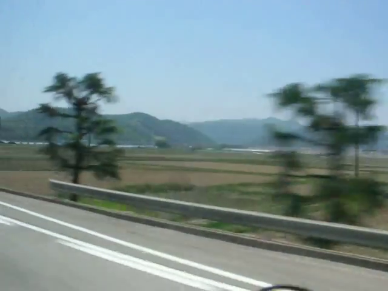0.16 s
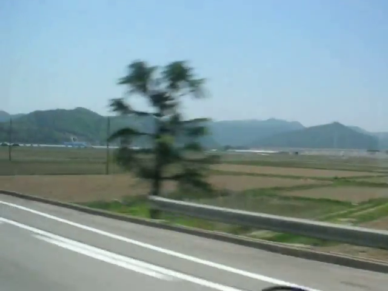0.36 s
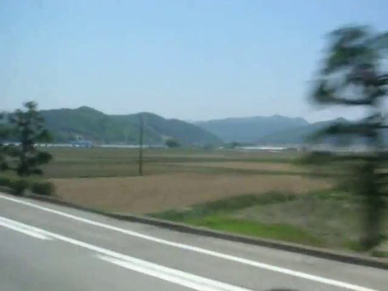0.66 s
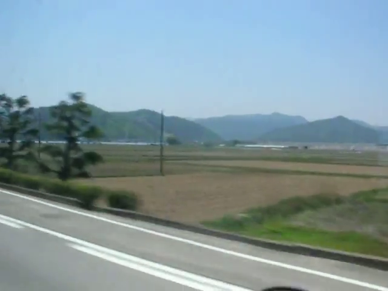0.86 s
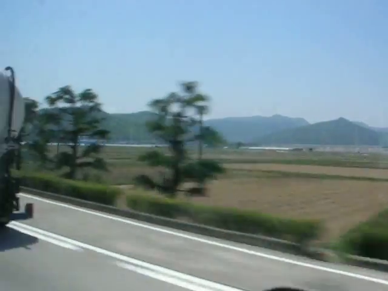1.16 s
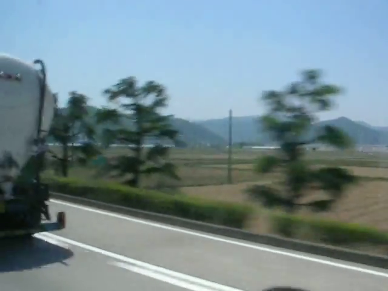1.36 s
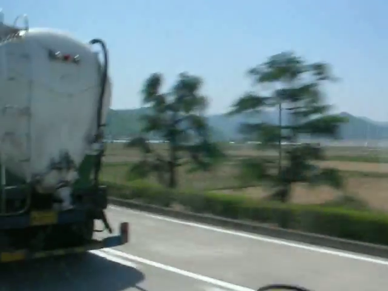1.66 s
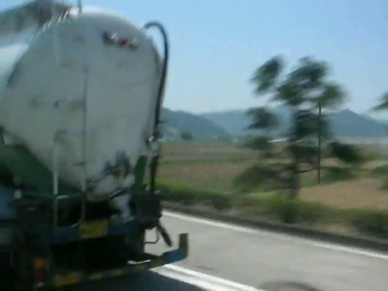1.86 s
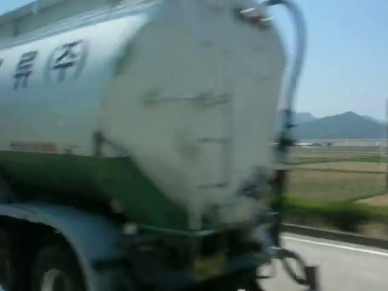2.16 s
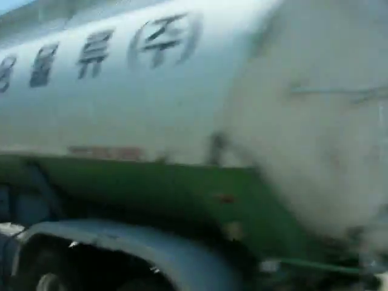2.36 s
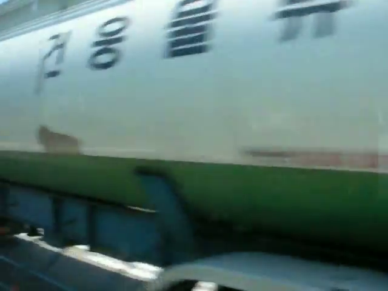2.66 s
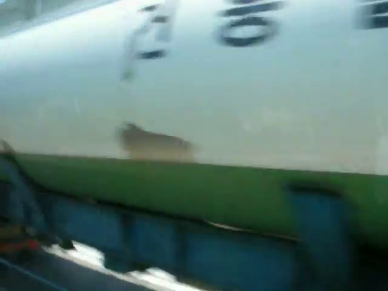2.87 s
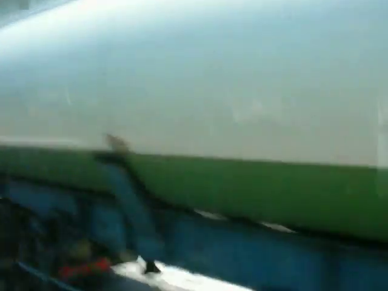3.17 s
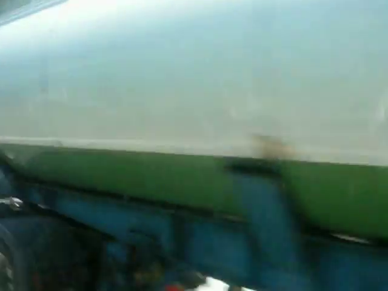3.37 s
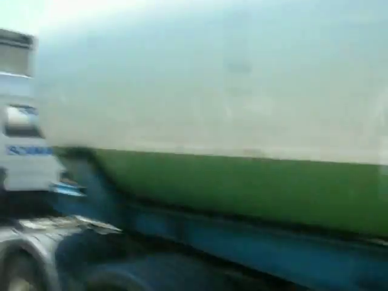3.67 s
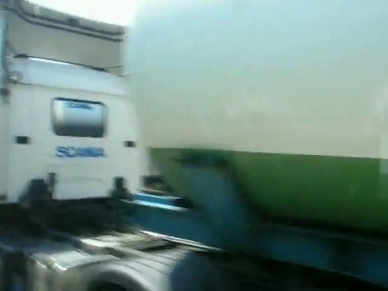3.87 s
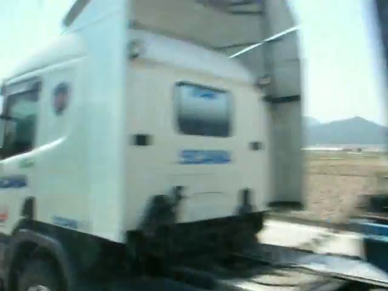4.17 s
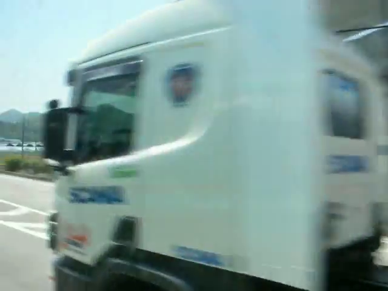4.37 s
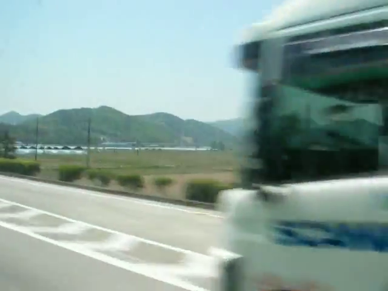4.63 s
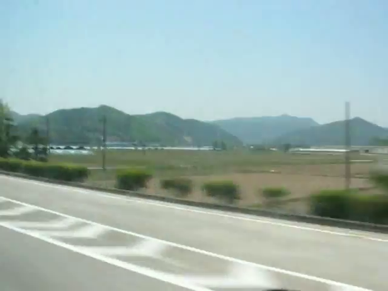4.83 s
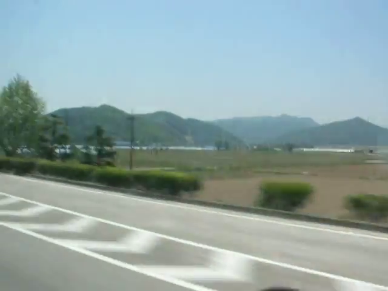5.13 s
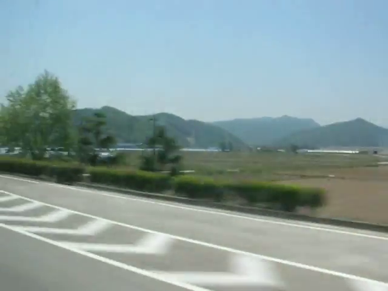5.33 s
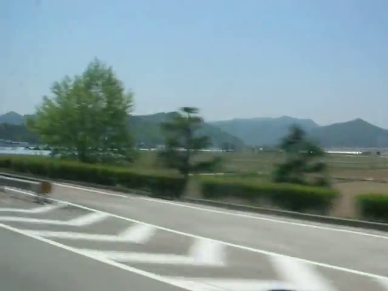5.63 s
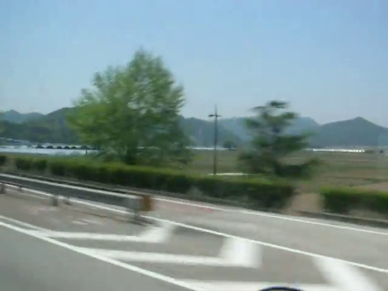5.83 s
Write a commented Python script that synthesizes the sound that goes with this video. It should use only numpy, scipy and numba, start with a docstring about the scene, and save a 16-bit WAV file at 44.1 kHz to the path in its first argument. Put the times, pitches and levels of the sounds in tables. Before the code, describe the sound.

Inside a coach at highway speed: heavy low engine drone and tyre roar, pumping unevenly, roughened by tiny ticks as a lorry is overtaken.

```python
"""Inside a coach at highway speed, a stereo camera microphone in the cabin.
Engine orders, a gear whine and body panels drone; tyres roar and air hisses, thumps and puffs.
Slow pressure surges, too low to hear and strongest beside an overtaken lorry, overload the camera:
its gain control steps down and up, so the drone pumps and every step ticks."""
import sys
import numpy as np
from scipy import signal
from scipy.fft import rfft, irfft, next_fast_len
from scipy.io import wavfile
from scipy.ndimage import map_coordinates
from numba import njit

SR = 44100
rng = np.random.default_rng(int(sys.argv[2]) if len(sys.argv) > 2 else 0)


def gain_from_db(level_db):
    """Turn a decibel level (scalar or array-like) into a linear amplitude factor."""
    decades = np.asarray(level_db, float) / 20
    return 10 ** decades


def persist_wave(psi):
    """Save psi, clipped to +-1, as 16-bit WAV."""
    counts = np.round(np.clip(psi, -1, 1) * 32767).astype(np.int16)
    wavfile.write(sys.argv[1], SR, np.atleast_2d(counts).T)


N = 264600  # samples, 6 s


def along(points, hz):
    """Read a curve of (Hz, value) points on a logarithmic frequency axis."""
    point_hz, values = np.transpose(points)
    return np.interp(np.log(hz + 1), np.log(point_hz + 1), values)


def over_time(points):
    """Read a curve of (s, value) points sample by sample."""
    return np.interp(np.arange(N) / SR, *np.transpose(points))


def unit(x):
    """Scale to rms 1."""
    return x / np.sqrt(np.mean(x ** 2))


def wobble(rate):
    """A smooth random curve with rate knots a second."""
    knots = rng.standard_normal(int(N * rate / SR) + 4)
    return map_coordinates(knots, [np.arange(N) * rate / SR])


def filtered(x, response):
    """Multiply the spectrum of x by a complex response of frequency."""
    size = next_fast_len(N + 8192)
    return irfft(rfft(x, size) * response(np.fft.rfftfreq(size, 1 / SR)), size)[..., :N]


# Likeness of the two microphone sides: pitch_hz, correlation (1 = identical)
LIKENESS = [(30, 0.87), (60, 0.96), (130, 0.97), (620, 0.93), (1400, 0.68), (3000, 0.3), (6000, 0.29),
            (9000, 0.63)]


def rush(gain):
    """Stereo noise of rms 1: the mid/side split at each frequency sets how alike the sides are."""
    def mid_side(hz):
        turn = np.arccos(np.clip(along(LIKENESS, hz), -1, 1)) / 2
        return gain(hz) * [np.cos(turn), np.sin(turn)]
    mid, side = filtered(rng.standard_normal((2, N)), mid_side)
    return unit(np.array([mid + side, mid - side]))


# Tyre noise thrown back from beside the road: time_s, level_db
ROADSIDE = [(0, 1.3), (1.1, -0.5), (1.45, 1), (1.7, 0.5), (2.3, 2), (2.6, 0.2), (3.2, 0.54), (4.2, 0),
            (4.34, 3), (4.45, -1), (4.55, 0.5), (4.63, 3), (4.72, 1), (4.8, 1.5), (5.05, 2.5), (5.3, 0.7),
            (6.0, 0.7)]


def roadside_db():
    """The level of the noise thrown back from beside the road rises and falls along the way."""
    return over_time(ROADSIDE)


# Colour of the air at the window seals: pitch_hz, relative level_db per Hz
SEAL_HISS = [(500, -7.5), (1500, -4), (3000, -5), (5000, -5.5), (7000, -3), (8500, -23.5), (11000, -23),
             (14000, -28.5)]


def seal_hiss():
    """Air at the window seals: broad noise that follows the roadside level, exaggerated."""
    return gain_from_db(-57.5 + 1.2 * roadside_db()) * rush(lambda hz: gain_from_db(along(SEAL_HISS, hz)))


# A brief rub, an airy puff, a short mid-range whoosh:
# crest_s, spread_s (standard deviation), pitch_hz, width_hz (two standard deviations), level_db (crest rms)
NOISE_PUFFS = [(.79, 0.059, 2003, 300, -41.5), (4.547, 0.018, 6900, 5030, -39.5),
               (4.63, 0.056, 840, 795, -34.5)]


def puffs():
    """Bands of noise that each swell and fade on a bell curve."""
    t = np.arange(N) / SR
    total = 0
    for crest_s, spread_s, pitch_hz, width_hz, level_db in NOISE_PUFFS:
        swell = np.exp(-.5 * ((t - crest_s) / spread_s) ** 2)
        band = rush(lambda hz: np.exp(-2 * ((hz - pitch_hz) / width_hz) ** 2))
        total = total + gain_from_db(level_db) * swell * band
    return total


# Colour of the tyre noise: pitch_hz, relative level_db per Hz
TYRE_COLOUR = [(300, -26), (400, -11), (570, -9.5), (720, 0), (870, -5), (1050, -2), (1100, -6),
               (1400, -13), (3000, -16), (7000, -37.5), (9000, -83)]


def tyres():
    """Tyre roar: coloured noise, wandering in level and raised by the roadside."""
    level_db = -34.0 + roadside_db() + .7 * wobble(5.3) + 1.2 * wobble(8.5)
    return gain_from_db(level_db) * rush(lambda hz: gain_from_db(along(TYRE_COLOUR, hz)))


# Colour of the air thumping on the flanks: pitch_hz, relative level_db per Hz
BUFFET_COLOUR = [(20, -15.5), (40, 3), (50, -2.5), (60, 6.5), (80, 6.5), (120, -5), (200, -56)]
# Strength of the air on the flanks, before buffeting() scales it: time_s, strength_db
FLANK_AIR = [(0, 1.5), (0.221, 1.5), (0.8, -3), (1.45, -4), (1.7, 0.5), (2.1, 5.5), (2.45, 7.5), (2.7, 0),
             (3.0, 1), (3.38, -2.5), (3.9, -1), (4.3, -1), (4.62, -8.5), (4.95, -8), (5.3, -5.5),
             (6.0, -1.5)]


def buffeting():
    """Turbulent air thumps on the flanks: low noise with an irregular level."""
    level_db = -19 + .3 * over_time(FLANK_AIR) + 1.8 * wobble(5) + 1.1 * wobble(11)
    return gain_from_db(level_db) * rush(lambda hz: gain_from_db(along(BUFFET_COLOUR, hz)))


# How hard the road and engine shake the body: time_s, level_db
SHAKING = [(0, -0.2), (1.0, 1.17), (1.5, 2), (1.9, -0.7), (2.15, 0.5), (2.3, -2.5), (2.451, 1.5),
           (2.55, -1.5), (3.15, -1.5), (3.401, -1.85), (4.0, -0.84), (4.6, 2), (5.3, 2.24), (6.0, 0.2)]


def shaking_db():
    """The common drive of the body panels and, more weakly, the engine lines."""
    return over_time(SHAKING)


# Engine orders, steady hums and the gear whine: pitch_hz
LINE_HZ = [60.5, 121, 155, 205.5, 242, 286, 322, 646]
# The same lines in order: level_db (rms before shaking), waver_db (scales the random level curve)
LINE_LEVELS = [(-38, 3), (-27.5, 1.5), (-38, 2.5), (-33.5, 2.5), (-28.5, 1.16), (-38, 2.5), (-45.5, 2.5),
               (-41, 3)]


def engine():
    """Steady sine lines that waver a little in level and phase."""
    t = np.arange(N) / SR
    total = 0
    for pitch_hz, (rms_db, waver_db) in zip(LINE_HZ, LINE_LEVELS):
        level_db = rms_db + .6 * shaking_db() + waver_db * wobble(8)
        phase = 2 * np.pi * pitch_hz * t + 0.4 * wobble(4)
        total = total + np.sqrt(2) * gain_from_db(level_db) * np.sin(phase)
    return total


# Colour of the body panels before the cabin resonates: pitch_hz, relative level_db per Hz
PANELS = [(60, -20.5), (100, -3.5), (160, -6), (290, -8), (325, -17.5), (350, -32), (560, -32), (900, -57)]
# Cabin resonances: pitch_hz, width_hz (at half height), level_db (added to the direct sound)
RESONANCES = [(122, 37, 3), (203.9, 17, 2.5), (240.5, 24, 7), (286.8, 11, -10.5)]


def body_roar():
    """Shaken panels give low noise, which booms in the cabin's resonances."""
    def boom(hz):
        gain = 1
        for pitch_hz, width_hz, level_db in RESONANCES:
            gain = gain + gain_from_db(level_db) * width_hz ** 2 / (width_hz ** 2 + (2 * (hz - pitch_hz)) ** 2)
        return gain
    level_db = -18.5 + shaking_db() + .8 * wobble(10)
    return gain_from_db(level_db) * rush(lambda hz: gain_from_db(along(PANELS, hz)) * boom(hz))


# Swings of cabin pressure:
# time_s (the crest, or up to 4 ms after it for low swings), height_db (0 = full scale)
PRESSURE_SWINGS = [(0.059, -2.5), (0.109, -5), (0.132, -3.5), (0.164, 3), (0.194, 6), (0.22, 0),
                   (0.248, 2.5), (0.278, 3), (0.326, 4), (0.351, 5), (0.382, 0), (0.414, 0.5),
                   (0.442, -5.5), (0.469, 4.5), (0.496, 5.5), (0.53, 1), (0.56, -2), (0.593, 3), (0.61, 6),
                   (0.647, 5), (0.664, 0.5), (0.694, 4), (0.725, -1.5), (0.755, -1.5), (0.777, 1),
                   (0.812, -2), (0.843, 0.5), (0.886, 3.5), (0.934, 5.5), (0.961, 6), (1.004, -3),
                   (1.053, 3), (1.087, 0.5), (1.119, -0.5), (1.165, 2), (1.2, 1), (1.229, 1.5), (1.269, 2),
                   (1.3, 2.5), (1.314, -2), (1.36, 3.5), (1.401, -2), (1.443, -2.5), (1.465, -1),
                   (1.495, -8), (1.524, 3.5), (1.557, 8), (1.589, 1), (1.622, 3.5), (1.664, 4.5),
                   (1.699, 3), (1.724, 6.5), (1.752, 1), (1.782, 1.5), (1.826, -1), (1.843, 6), (1.878, 9),
                   (1.901, 5), (1.929, 12), (1.957, 5), (1.984, 7.5), (2.012, 13), (2.05, 9), (2.067, 9),
                   (2.089, 12), (2.127, 3), (2.164, -0.5), (2.185, 8), (2.227, 9.5), (2.256, 3.5),
                   (2.287, 8.5), (2.325, 12), (2.355, 4), (2.383, 10.5), (2.409, 4.5), (2.44, 3),
                   (2.469, 7), (2.506, 10.5), (2.544, 7.5), (2.584, 3.5), (2.621, 2.5), (2.637, 5.5),
                   (2.651, 8), (2.693, 9), (2.733, 10), (2.756, 7), (2.779, 9.5), (2.822, 10), (2.86, 12.5),
                   (2.896, 10.5), (2.929, 9), (2.962, 2), (2.995, 3.0), (3.011, 10.5), (3.049, 13),
                   (3.078, 13.0), (3.106, 7), (3.134, 12.5), (3.168, 13.5), (3.208, 9), (3.25, 9.5),
                   (3.277, 5), (3.302, 9), (3.345, -1.5), (3.389, -2), (3.417, 3), (3.434, 4), (3.475, 2.0),
                   (3.519, 4), (3.545, 1.5), (3.573, 4.5), (3.603, 1.5), (3.633, 6.5), (3.671, 6.5),
                   (3.695, 2), (3.723, 1), (3.74, 4.5), (3.771, 7), (3.804, 0.5), (3.839, -3.5), (3.872, 4),
                   (3.901, 3), (3.931, 1), (3.957, 1.5), (3.986, -1.5), (4.013, 0.5), (4.03, 2.5),
                   (4.052, 6), (4.087, 0), (4.126, 0), (4.152, 5), (4.193, -0.5), (4.237, -2), (4.262, 1),
                   (4.305, -3.5), (4.347, 0.5), (4.373, 4), (4.399, -5), (4.427, -1.5), (4.449, 0.5),
                   (4.479, -2.5), (4.508, -3), (4.544, -5), (4.562, -3), (4.593, -5), (4.624, -8),
                   (4.642, -8), (4.659, -7.5), (4.678, -3), (4.727, 2), (4.757, -1.5), (4.792, -6),
                   (4.826, -3), (4.859, -3), (4.89, -0.5), (4.931, 1.5), (4.971, -0.5), (5.003, -4),
                   (5.019, 0.5), (5.052, -3), (5.09, -3.5), (5.107, 1.5), (5.147, -1), (5.161, -4),
                   (5.187, 1), (5.234, -3.5), (5.275, -5), (5.293, -2), (5.32, -3), (5.347, -3),
                   (5.366, 1.5), (5.383, -2), (5.405, -4.5), (5.435, -4.5), (5.462, 4.5), (5.498, -3.5),
                   (5.532, -3), (5.544, 0.5), (5.568, 0.5), (5.592, -0.5), (5.626, 0.5), (5.655, -2),
                   (5.691, -1), (5.718, 0), (5.74, 2), (5.777, 0), (5.801, 0), (5.823, 0), (5.852, -2.5),
                   (5.882, 6), (5.927, -1), (5.949, 5.5), (5.992, 1.5)]


def surges(share=.38, longest_s=0.016):
    """Crests push and pull in turn, smooth bell-shaped swings, broader when neighbours are far."""
    crest_lead_s, steep_db = .004, 9  # the longest lead of a low crest; no lead from this height up
    same_swing_s = .022  # crests no further apart than this share a sign
    margin = SR // 10
    pressure, t = np.zeros(N + SR // 5), np.arange(-margin, margin) / SR
    gaps = np.diff(np.transpose(PRESSURE_SWINGS)[0], prepend=-1, append=N / SR + 1)
    widths = np.clip(share * gaps, .005, longest_s)
    signs = (-1.) ** np.cumsum(gaps > same_swing_s)
    for k, (time_s, height_db) in enumerate(PRESSURE_SWINGS):
        width = np.where(t < 0, widths[k], widths[k + 1])
        swing = signs[k] * gain_from_db(height_db) * np.exp(-.5 * (t / width) ** 2)
        crest_s = time_s - crest_lead_s * np.clip(1 - height_db / steep_db, 0, 1)
        pressure[round(crest_s * SR):][:len(t)] += swing
    return pressure[margin:][:N]


# Balance of the sides: pitch_hz, level_db (left minus right)
SIDE_BALANCE = [(60, -1.68), (200, -2), (600, 0), (4000, -1), (8000, -1.1)]


def scene():
    """Everything at the microphones; the surges lean a little to one side or the other."""
    halves = [.5, -.5]  # left up, right down by half the difference
    audible = body_roar() + buffeting() + tyres() + engine() + seal_hiss() + puffs()
    heard = filtered(audible, lambda hz: gain_from_db(np.outer(halves, along(SIDE_BALANCE, hz))))
    return heard + surges() * gain_from_db(np.outer(halves, 1.5 * wobble(12)))


@njit
def stepped_gain(peak, step, quiet, target, ceiling, relief, fast, slow, fade, most):
    """Fast steps down from ceiling to relief; slow steps down over target, up once the fading peak is quiet."""
    gain, g, held, wait, limiting = np.empty(len(peak)), 0.9, 0.0, 0.0, False
    for i in range(len(peak)):
        now = peak[i] * g
        held = max(now, held * fade)
        limiting = now > (relief if limiting else ceiling)
        wait += 1
        if limiting and wait >= fast:
            g, held = g / step, held / step
            wait = (wait - fast) % 1.0  # carry the fraction of a sample
        elif wait >= slow and held > target:
            g, held, wait = g / step, held / step, 0.0
        elif wait >= slow and held < quiet:
            g, wait = min(g * step, most), 0.0
        gain[i] = g
    return gain


def band_limit(x):
    """A steep low-pass at the top of the band."""
    return signal.sosfilt(signal.butter(12, 14460, fs=SR, output="sos"), x)


# Overall tone, with a narrow notch at 8 kHz: pitch_hz, level_db
OVERALL_TONE = [(290, 6), (380, 0.5), (540, 3), (700, 3), (1500, 0.5), (3000, -1), (5000, 3.5), (7000, -2),
                (7450, -10), (7750, -18), (8000, -30), (8200, -12), (8450, -2), (9500, 9), (11500, 5.5),
                (13400, 4.5)]
# Band limit at the top: pitch_hz, level_db
BAND_LIMIT = [(13450, 0), (13650, -14), (14400, -28), (15200, -60)]


def record(dry):
    """Stepped gain shared by both sides; then the low cut removes the surges, leaving steps as ticks."""
    quiet, target, ceiling, relief = .25, .44, .45, .415  # thresholds, full scale 1
    fast_s, slow_s, fade_s = 1.043e-4, 3.337e-3, 0.02  # waits between steps; fading of the held peak
    step, most = gain_from_db(.75), gain_from_db(-4.0)  # one gain step; the most gain that steps up can reach
    peak = np.abs(dry).max(0)
    gain = stepped_gain(peak, step, quiet, target, ceiling, relief,
                        fast_s * SR, slow_s * SR, np.exp(-1 / (fade_s * SR)), most)
    circuit_noise = gain_from_db(-77) * rng.standard_normal(dry.shape)

    def response(hz):
        cut_hz = 52  # corner of each of three equal low-cut stages
        low_cut = (1j * hz / (cut_hz + 1j * hz)) ** 3
        return low_cut * gain_from_db(along(OVERALL_TONE, hz) + along(BAND_LIMIT, hz))
    mix = filtered(dry * gain + circuit_noise, response)
    return band_limit(mix)


dry = scene()
out = record(dry)
persist_wave(out)
```